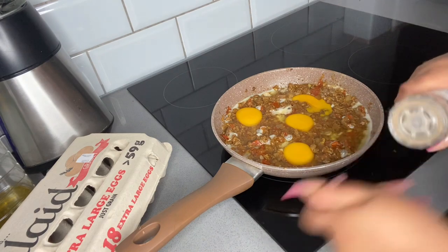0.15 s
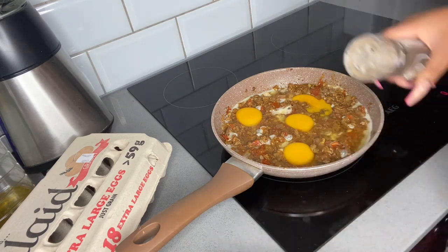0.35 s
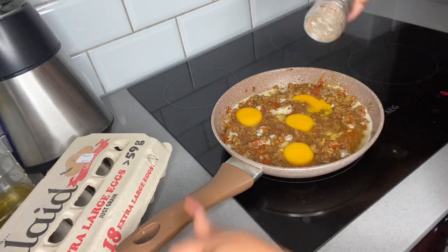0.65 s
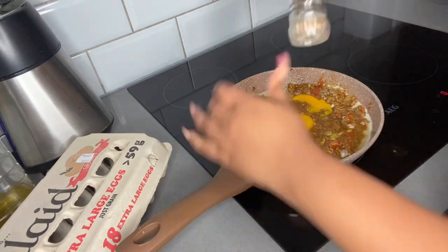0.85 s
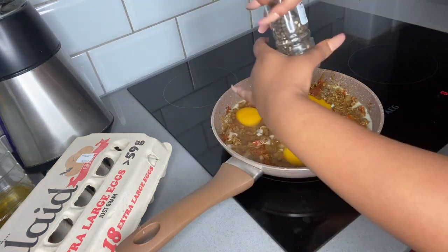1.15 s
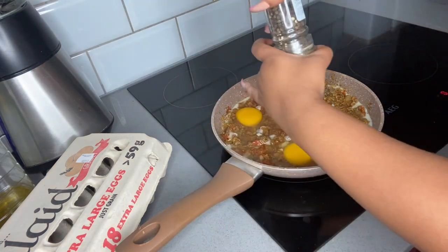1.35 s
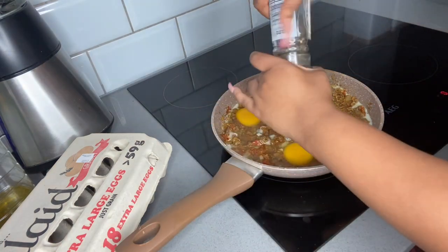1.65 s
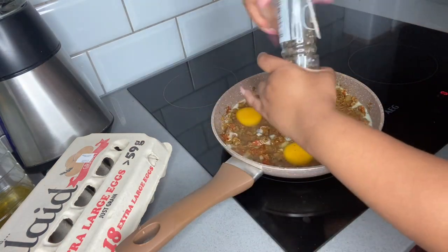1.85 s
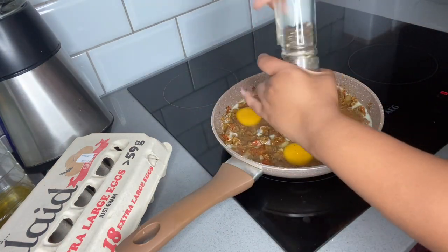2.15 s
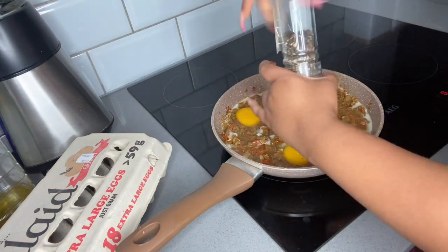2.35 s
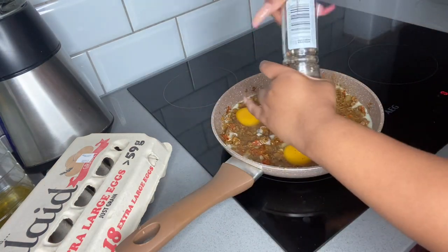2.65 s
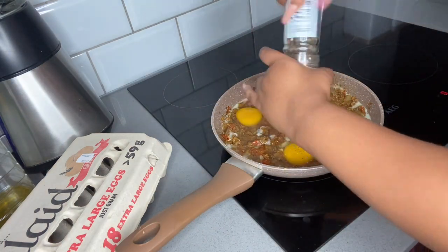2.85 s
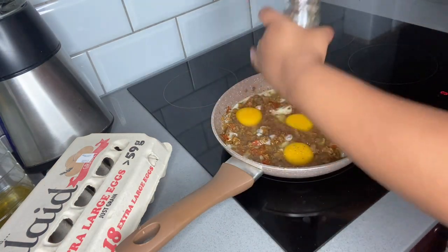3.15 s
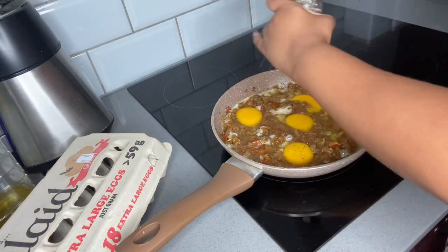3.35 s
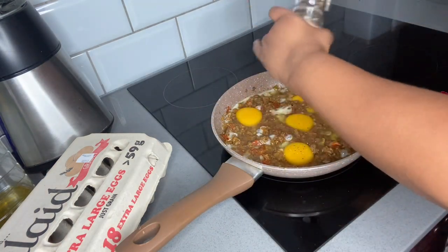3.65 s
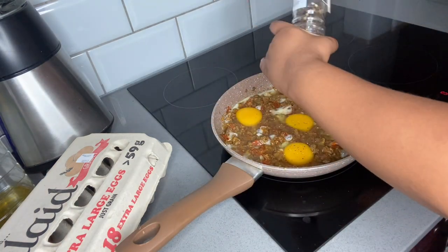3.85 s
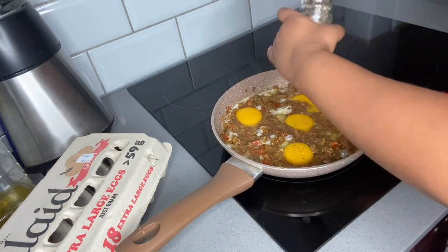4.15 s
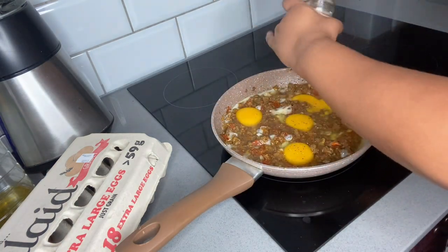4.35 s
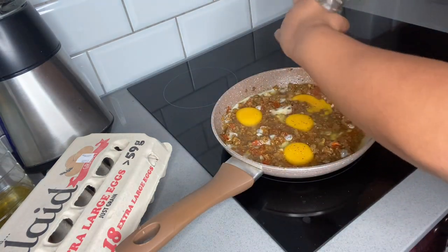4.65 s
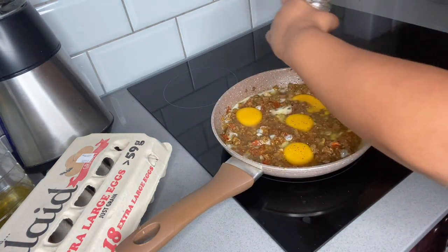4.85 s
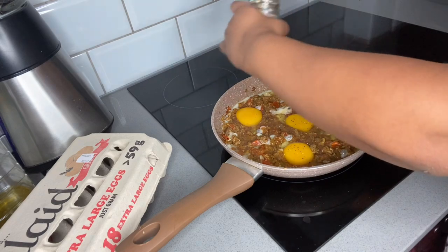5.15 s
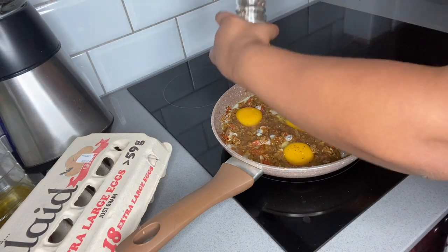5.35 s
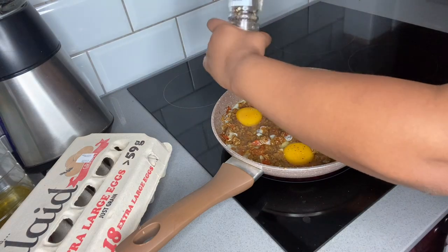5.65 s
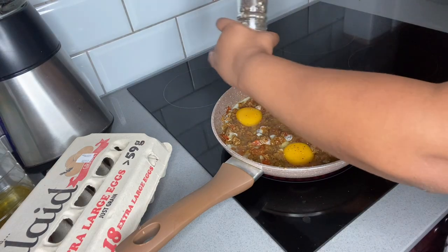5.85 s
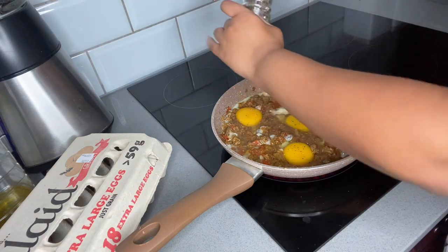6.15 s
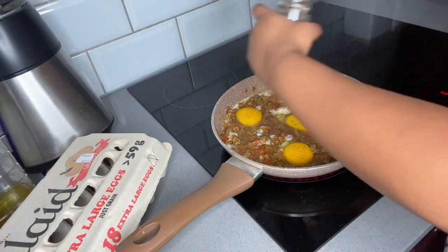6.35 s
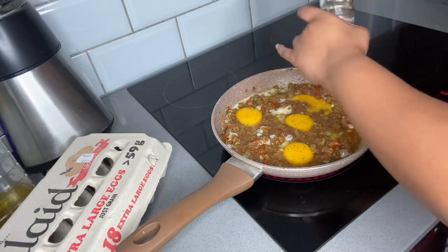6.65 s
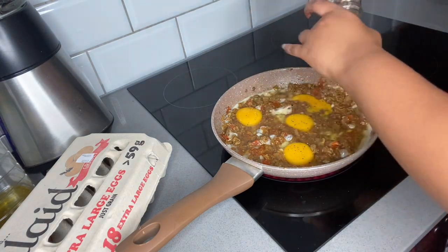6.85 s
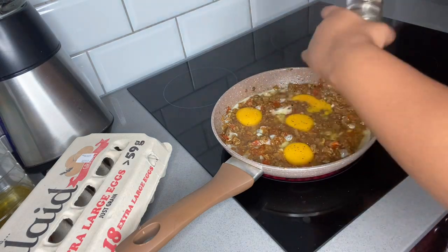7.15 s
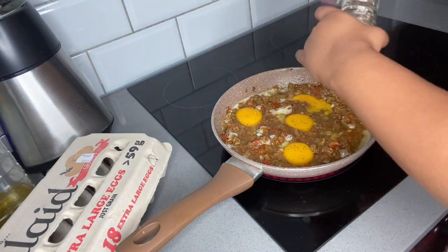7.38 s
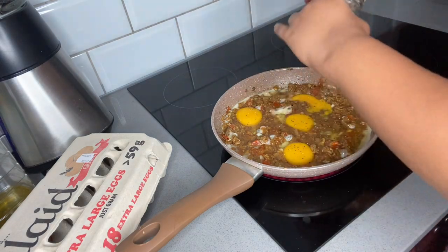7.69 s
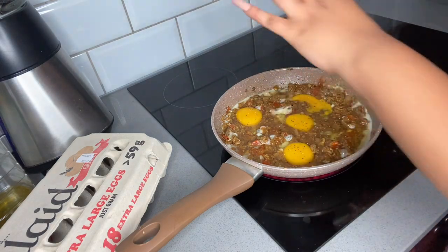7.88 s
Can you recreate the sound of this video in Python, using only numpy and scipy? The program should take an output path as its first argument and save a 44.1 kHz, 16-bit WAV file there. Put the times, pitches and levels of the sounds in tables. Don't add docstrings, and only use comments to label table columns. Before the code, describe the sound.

A hand-held glass pepper grinder is shaken once, then cranked in brief crunchy bites over a pan. Each bite mixes brittle snaps, scraping grit and bright plastic clicks, followed by fine sliding of corns. A few cracks jump out loudest around the middle, and one tiny squeal comes near the end. Tiled-room reflections are short; low rumble and mains hum stay faint behind the close phone pickup.

```python
import sys
import numpy as np
from scipy import signal
from scipy.fft import rfft, irfft, next_fast_len
from scipy.io import wavfile
from scipy.ndimage import uniform_filter1d

SR = 44100
rng = np.random.default_rng(int(sys.argv[2]) if len(sys.argv) > 2 else 0)


def materialize(psi):
    bounded = np.clip(np.atleast_2d(psi).T, -1, 1)
    quanta = np.round(bounded * 32767).astype(np.int16)
    wavfile.write(sys.argv[1], SR, quanta)


def undo_db(level):
    steps = np.asarray(level, float) / 20
    return 10 ** steps


N = 353682

# centre in Hz, width in Hz, level in dB.
SNAP_MODES = [(4780, 2200, -7.5), (6230, 630, 3), (8000, 850, 1.5), (10500, 620, 5), (13180, 3000, -10.5)]
SHELL_MODES = [(1250, 260, -8), (1745, 190, 0), (2330, 380, -3), (3200, 700, -7)]
BODY_MODES = [(256.4, 41, 1), (347, 250, -1.3), (660, 102, 0.67), (877, 118, -2.4)]
GLASS_MODES = [(6250, 300, 0), (7900, 1200, -20), (12500, 3000, -21)]
# start in seconds, snap in dB, shell and thud in dB over the snap.
BREAKS = [(1.2826, -35.5, -8, -7), (1.5341, -28, -12.5, -9), (1.595, -36, 3, -2), (2.0185, -51, 16, -39),
          (2.0261, -19, -2.5, -38), (2.04, -34, 3, -26), (2.419, -21, -3.5, -8.5),
          (2.4485, -21.5, -16, -15), (2.4627, -23, -6, -13), (2.7724, -25, -2.5, -6.5),
          (2.8156, -24, -11, -10), (3.136, -32, 2, -11), (3.1487, -8.5, -7.5, -22),
          (3.5379, -29.5, -2, -25), (3.8617, -34, -15, -9), (3.9179, -13, -9.5, -21),
          (4.1862, -34, -8, -29), (4.1926, -11, -12.5, -17), (4.211, -39.5, 6.5, -20),
          (4.5592, -38.5, 6.5, -6), (4.5635, -23, -9, -17), (4.6005, -32.5, -4, -32),
          (5.2819, -16.5, -10, -11), (5.8966, -30, -5.5, -13), (5.92, -17, -7.5, -17),
          (6.416, -37, -3.5, -26), (6.5805, -32.5, -8, -9), (7.0786, -23.5, -11, -18),
          (7.1017, -23, -11.5, -17), (7.4804, -34.5, -2.5, -4)]
# start in seconds, snap in dB, shell in dB over the snap.
CHIPS = [(1.355, -38.5, -10.5), (1.386, -42.5, -8), (1.486, -54, 7), (1.5013, -45, 2.5),
         (1.5177, -35.5, -4), (1.955, -41.5, 5.5), (1.9982, -37.5, 1), (2.3877, -34, -25), (2.496, -39, -6),
         (2.7513, -41, -2), (3.8448, -42, -8), (3.87, -33, -10), (4.093, -45, -4), (4.3959, -44, 0),
         (4.8672, -56, -10), (5.0933, -50, -2), (5.2487, -40, -6), (5.642, -35.5, -11),
         (6.1161, -42.5, -1.5), (6.224, -45, -15), (6.3025, -41, -14), (6.598, -46, -14),
         (6.65, -40.5, -10.5), (6.8216, -38.5, -5), (6.8874, -37, -5), (7.006, -55, 2), (5.204, -42, -17),
         (5.555, -44, -15), (5.811, -54, -21), (6.78, -50, -4)]
# start in seconds, snap in dB, pitch in Hz.
GRIP_CLICKS = [(1.8556, -32, 6100), (2.32, -29.5, 7760), (2.7035, -23, 6700), (2.911, -44.5, 6150),
               (3.0512, -31, 6340), (3.424, -29, 8600), (3.4443, -32, 6400), (3.4979, -29.5, 6800),
               (3.553, -34, 6900), (3.5713, -29, 8000), (3.7987, -24, 6300), (4.1253, -27.5, 6430),
               (4.4953, -25, 6700), (4.8241, -27, 6350), (4.888, -26, 7500), (4.9938, -44, 6150),
               (5.1493, -33, 6700), (5.5959, -32, 6330), (5.7438, -41, 6200), (6.2093, -39, 5300),
               (6.2634, -29.5, 7000), (6.9283, -41, 6000), (7.022, -36, 7660), (7.3904, -25.5, 8900),
               (7.4584, -33.5, 8600), (1.723, -70, 7000), (1.766, -68, 7000), (2.219, -52, 6860),
               (5.462, -50, 6800), (7.722, -56, 6800)]
# start in seconds, length in seconds, grit in dB, scrape in dB.
STROKES = [(1.281, 0.019, -47, -51.5), (1.36, 0.084, -62.5, -58), (1.485, .064, -53.5, -50.5),
           (1.569, 0.018, -46.5, -46), (1.96, 0.077, -39, -49), (2.022, 0.03, -36.5, -40.5),
           (2.378, 0.038, -67, -48), (2.42, 0.043, -34, -42), (2.759, 0.092, -44, -44),
           (3.138, 0.048, -31.5, -41.5), (3.408, 0.034, -58.5, -52), (3.496, 0.037, -33.5, -40),
           (3.533, .039, -40, -47), (3.855, 0.057, -47.5, -47), (4.102, 0.037, -54, -70),
           (4.184, 0.065, -41, -40), (4.529, .04, -46, -49), (4.563, 0.031, -34, -40.5),
           (4.868, 0.061, -39.5, -42.5), (5.081, 0.017, -48, -51.5), (5.198, 0.07, -58.5, -62),
           (5.295, 0.035, -40.5, -41.5), (5.624, 0.085, -43.5, -51.5), (5.918, 0.044, -41, -48),
           (6.172, 0.049, -60, -61.5), (6.322, 0.066, -52.5, -53), (6.379, 0.036, -42.5, -49.5),
           (6.585, 0.009, -44, -47.5), (7.011, 0.14, -46, -50.5), (7.459, 0.05, -39.5, -46)]
# time in seconds, rattle in dB.
SHAKE = [
    (.56, -69),
    (.6, -60.5),
    (.7, -62.5),
    (.73, -48.5),
    (.78, -40),
    (.85, -46),
    (.9, -61),
    (.96, -62),
    (1.02, -85),
]
# time in seconds, level in dB.
NECK_LEVEL = [(1.9, -11), (3.0, -2), (6.2, 1), (7.5, 1)]
# time in seconds, pitch in Hz, level in dB.
SQUEAL = [
    (7.478, 5600, -50),
    (7.49, 5050, -39),
    (7.498, 5100, -36),
    (7.51, 5580, -29.5),
    (7.52, 5500, -49),
]
# start in seconds, level in dB.
TILTS = [(.28, -58), (.6, -49.5), (.74, -59), (.86, -45.5), (.96, -57), (3.02, -57), (3.76, -55.5),
         (4.1, -55), (5.74, -51.5), (6.18, -48), (6.9, -48), (7.16, -48.5), (7.58, -47), (7.97, -51)]
HELD_SPAN = (1.28, 7.66)
# level in dB, pitch in Hz, treble in dB, T60 in ms.
CAP_KNOCKS = [
    (-32.5, 1860, -3.5, 48),
    (-41.5, 200, -30, 320),
    (-38.5, 3380, -24, 130),
    (-33, 3230, 13.5, 120),
    (-36.5, 4150, 4.5, 76),
]
CAP_STARTS = [.229, .2291, .2275, .2705, .3303]
# frequency in Hz, T60 in seconds.
ROOM_T60 = [(300, 0.67), (2000, 0.48), (8000, 0.37), (16000, 0.3)]
# frequency in Hz, side over mid in dB.
WIDTH = [(60, -18), (200, -10), (600, -5), (1300, -6), (2600, -2), (6000, -10), (10000, -30), (16000, -16)]
# time in seconds, shaft in Hz, 4th, 7th and 8th orders in dB.
LOW_GEAR = [(0.0, 20.52, -43.5, -60, -46.5), (0.48, 21.18, -49.5, -60, -59),
            (1.78, 23.08, -47, -58.5, -49.5), (2.7, 24.26, -57.5, -57, -70.5),
            (3.06, 24.53, -45, -54.5, -71)]
# time in seconds, shaft in Hz, 3rd and 7th orders in dB.
HIGH_GEAR = [(5.2, 20.8, -47, -68), (5.6, 21, -51, -69), (6.5, 20, -47.5, -55.5), (7.2, 21.2, -58.5, -68.5),
             (8.02, 22.3, -43.5, -66.5)]
# frequency in Hz, level in dB.
MAINS = [(100.0, -54.5)]
# time in seconds, level in dB.
RUMBLE = [(0.0, -43.5), (3.69, -46), (5.96, -42.5), (6.17, -45.5), (7.82, -46.5), (8.02, -51)]
# frequency in Hz, density in dB per Hz.
AIR = [(25, -18), (45, -3.5), (60, 7), (100, -10), (250, -18.5), (1300, -33.5), (6200, -40), (16000, -43)]
# frequency in Hz, right channel lead in radians.
PORT_LEAD = [(7400, 0.0), (8800, 1.3), (9850, 3.1), (10750, 3.18), (12400, 6.2), (13500, 6.36),
             (15300, 9.36), (16500, 9.5)]
# frequency in Hz, gain in dB.
MIC_TOP = [(14500, 0.5), (15500, 11), (16300, -8), (17000, -46)]

TIME = np.arange(N) / SR
SIZE = next_fast_len(N + SR)
HZ = np.fft.rfftfreq(SIZE, 1 / SR)
BIN_SIZE = 2 * len(HZ) - 2
EVENT = SR // 5


def curve(table):
    s, *columns = np.transpose(table)
    return [np.interp(TIME, s, c) for c in columns]


def across(table):
    hz, value = np.transpose(table)
    return np.interp(np.log(HZ + 1), np.log(hz), value)


def apply(x, response):
    return irfft(rfft(x, BIN_SIZE) * response, BIN_SIZE)[..., :N]


def ring(x, modes):
    response = 0
    for k, (hz, width, db) in enumerate(modes):
        damping = 1j * HZ * width
        response = response + (-1) ** k * undo_db(db) * damping / (hz ** 2 - HZ ** 2 + damping)
    return apply(x, response / np.sqrt(np.mean(abs(response) ** 2)))


def peak(x, hz, width):
    return signal.lfilter(*signal.iirpeak(hz, hz / width, SR), x) * np.sqrt(SR / (np.pi * width))


def walk(rate):
    k = int(SR / rate)
    steps = np.repeat(rng.standard_normal(N // k + 1), k)
    return 2.25 * uniform_filter1d(uniform_filter1d(steps, k), k)[:N]


def grains(rate, scatter_db, smear_s):
    sizes = undo_db(scatter_db * np.minimum(rng.exponential(size=N), 2.5))
    ticks = (rng.random(N) < rate / SR) * sizes
    smeared = signal.lfilter([1], [1, -np.exp(-1 / (smear_s * SR))], ticks) * rng.standard_normal(N)
    return smeared / np.sqrt(np.mean(smeared ** 2))


def burst(t60_ms, snap=3.23, snap_s=0.00012):
    t = np.arange(EVENT) / SR
    crumbling = np.exp(-np.log(1000) * t / (0.0011 * max(t60_ms, 5)))
    return (crumbling + snap * np.exp(-t / snap_s)) * np.minimum(t / 0.000071, 1)


def crack_events():
    # s, snap dB, shell dB, thud dB, T60 ms, pitch Hz, height of the snap over the crumbling
    events = [(s, db, -22, -30.5, 19.7, hz, 7.4) for s, db, hz in GRIP_CLICKS]
    events += [(*row, 42.5, 6900, 4.8) for row in BREAKS]
    events += [(*row, -12, 51, 6900, 4.8) for row in CHIPS]
    return events


def cracks():
    pitch_spread = 0.043
    shard_hz, shard_octaves, shard_db = 2212, 0.36, -9
    drive, noise = np.zeros((4, N + SR)), rng.standard_normal((4, N + SR))
    for s, snap_db, shell_db, thud_db, t60_ms, hz, edge in crack_events():
        now = slice(int(s * SR), int(s * SR) + EVENT)
        for k, (db, stretch) in enumerate(zip((0, shell_db, thud_db), (0.8, 0.9, 1.2))):
            drive[k, now] += undo_db(snap_db + db) * burst(stretch * t60_ms, edge) * noise[k, now]
        pitch_luck, shard_luck = np.tanh(rng.standard_normal(2))
        hz = hz * (1 + pitch_spread * pitch_luck)
        low_hz = shard_hz * 2 ** (shard_octaves * shard_luck)
        chirp = peak(burst(0.3 * t60_ms) * noise[3, now], hz, 0.029 * hz)
        shard = peak(burst(0.68 * t60_ms) * noise[2, now], low_hz, 0.11 * low_hz)
        drive[3, now] += undo_db(snap_db - 3.0) * chirp + undo_db(snap_db + shell_db + shard_db) * shard
    snap, shell, thud, pitched = drive[:, :N]
    cracked = undo_db(0.5) * ring(snap, SNAP_MODES) + undo_db(-1.9) * ring(shell, SHELL_MODES)
    return cracked + undo_db(-1.6) * ring(thud, BODY_MODES) + pitched + grip_impulses()


def grip_impulses():
    click, hz = np.zeros(N), 5500
    for s, db, _ in GRIP_CLICKS:
        click[int(s * SR)] = undo_db(db + 10.5)
    return peak(peak(click, hz, 8930), hz, 8660)


def burrs():
    tumbling = abs(TIME - 0.79) < 0.23
    force = undo_db(curve(SHAKE)[0] + np.array([[0], [-13.5]])) * tumbling
    for start, length, grit_db, scrape_db in STROKES:
        end = start + length
        now = slice(int(start * SR), int(end * SR) + SR // 10)
        easing = np.exp(-np.maximum(TIME[now] - end, 0) / 0.021)
        force[:, now] = np.maximum(force[:, now], undo_db([[grit_db], [scrape_db]]) * easing)
    grit, scrape = uniform_filter1d(force, SR // 300) * undo_db(2.0 * walk(80))
    grit = grit * grains(900, 1.5, 0.0016)
    scrape = scrape * grains(500, 1.2, 0.0036)
    crushed = undo_db(2.5) * ring(grit, SNAP_MODES)
    scraped = undo_db(-5) * ring(scrape, SHELL_MODES) + undo_db(-4.5) * ring(scrape, BODY_MODES)
    neck = undo_db(curve(NECK_LEVEL)[0]) * peak(scrape, 1740, 220)
    return crushed + scraped + neck


def squeal():
    hz, db = curve(SQUEAL)
    slipping = (TIME > SQUEAL[0][0]) & (TIME < SQUEAL[-1][0])
    phase = 2 * np.pi * np.cumsum(hz * (1 + 0.03 * walk(900))) / SR
    return slipping * undo_db(db + 5 * walk(500)) * np.sin(phase)


def held():
    return uniform_filter1d(1.0 * ((TIME > HELD_SPAN[0]) & (TIME < HELD_SPAN[1])), SR // 20)


def sliding():
    grip_db, stroke_db, follow = -49.5, -50, 1
    rise_s, fall_s = 0.03, 0.087
    jolts = TILTS + [(s, grip_db + follow * (db + 32)) for s, db, _ in GRIP_CLICKS]
    jolts += [(s + length, stroke_db + follow * (grit_db + 35)) for s, length, grit_db, _ in STROKES]
    out = undo_db(-74) * held()
    for s, db in jolts:
        t = TIME[int(s * SR):int(s * SR) + SR // 2] - s
        now = slice(int(s * SR), int(s * SR) + len(t))
        slide = undo_db(db) * np.clip(t / rise_s, 0, 1) * np.exp(-t / fall_s)
        out[now] = np.maximum(out[now], slide)
    return out


def loose_corns():
    corns = grains(1500, 3.0, 0.001) * sliding() * undo_db(2.5 * walk(40))
    jar = [(6330, 460, 0)]  # Hz, width Hz, dB
    glass = undo_db(-0.5) * ring(ring(corns, jar), jar) / 6
    crumbs = undo_db(-68.5) * held() * ring(grains(60, 6.9, 0.00204), SNAP_MODES + SHELL_MODES)
    return glass + undo_db(-10) * ring(corns, GLASS_MODES) + crumbs


def cap():
    out, noise = np.zeros(N), rng.standard_normal((2, N))
    width = 850
    for s, (db, hz, treble_db, t60_ms) in zip(CAP_STARTS, CAP_KNOCKS):
        now = slice(int(s * SR), int(s * SR) + EVENT)
        edge = undo_db(treble_db) * peak(burst(0.13 * t60_ms) * noise[1, now], 9400, 4600)
        knock = burst(t60_ms) * noise[0, now]
        hollow = signal.lfilter(*signal.iirpeak(hz, hz / width / 2, SR), knock)
        out[now] += undo_db(db) * (peak(hollow, hz, width) + edge)
    return out


def kitchen(x, early_db=-8, early_s=0.011, tail_db=-12):
    t = np.arange(SR // 2) / SR
    early = rng.standard_normal((2, len(t))) * np.exp(-t / early_s) * np.sqrt(2 / (early_s * SR))
    response = rfft(early, BIN_SIZE) * undo_db([[early_db], [early_db + 13.0]])
    response[0] += 1
    for hz, t60 in ROOM_T60:
        share = across([(f, float(f == hz)) for f, _ in ROOM_T60])
        decay = np.exp(-np.log(1000) * t / t60) * np.minimum(t / 0.024, 1)
        tail = rng.standard_normal((2, len(t))) * decay / np.sqrt(np.sum(decay ** 2))
        response += share * rfft(tail, BIN_SIZE) * undo_db([[tail_db], [tail_db + 7.5]])
    power = uniform_filter1d(abs(response[0]) ** 2, size=1500)
    lean = uniform_filter1d((response[1] * response[0].conj()).real, size=1500) / power
    response[1] -= response[0] * lean
    response /= np.sqrt(power)
    side_level = np.sqrt(uniform_filter1d(abs(response[1]) ** 2, size=3000))
    response[1] *= undo_db(across(WIDTH) + 3) / side_level
    return apply(x, response)


def engine(table, orders):
    hz, *levels = curve(table)
    turns = 2 * np.pi * np.cumsum(hz * (1 + 0.006 * walk(12))) / SR
    in_gear = 1.0 * ((TIME >= table[0][0]) & (TIME <= table[-1][0]))
    tone = 0
    for k, db in zip(orders, levels):
        tone = tone + np.sqrt(2) * undo_db(db + 2.25 * walk(16)) * np.sin(k * turns)
    return uniform_filter1d(in_gear, SR // 10, mode="nearest") * tone


def mains_hum():
    return sum(np.sqrt(2) * undo_db(db + 0.5 * walk(1.2)) * np.sin(2 * np.pi * hz * TIME) for hz, db in MAINS)


def room_air():
    colour = undo_db(across(AIR)) * np.array([np.ones(len(HZ)), undo_db(across(WIDTH))])
    air = apply(rng.standard_normal((2, N)), colour / np.sqrt(np.mean(colour[0] ** 2)))
    low = apply(air, 1 / (1 + (HZ / 130) ** 4))
    top = apply(air, 1 - 1 / (1 + (HZ / 2500) ** 2))
    air = air + top * (undo_db(1.2 * walk(5.2) - 4) - 1)
    return low * undo_db(curve(RUMBLE)[0] - 2.5) + (air - low) * undo_db(-47.0 + 1.0 * walk(1.8))


def background():
    hum = mains_hum() + engine(LOW_GEAR, orders=(4, 7, 8)) + engine(HIGH_GEAR, orders=(3, 7))
    return room_air() + hum * np.array([[1], [undo_db(-21.0)]])


def scene():
    mill = cracks() + burrs() + squeal() + loose_corns() + cap()
    mid, side = kitchen(mill) + background()
    return np.array([mid + side, mid - side])


def top_cut(x):
    return signal.sosfilt(signal.butter(12, 16500, fs=SR, output="sos"), x)


def record(dry):
    turn = np.exp(0.5j * across(PORT_LEAD) * np.array([[-1], [1]]))
    rounded = np.tanh(1.58 * dry) / 1.86
    mix = apply(rounded, turn * undo_db(across(MIC_TOP)))
    return top_cut(mix)


dry = scene()
out = record(dry)
materialize(out)
```